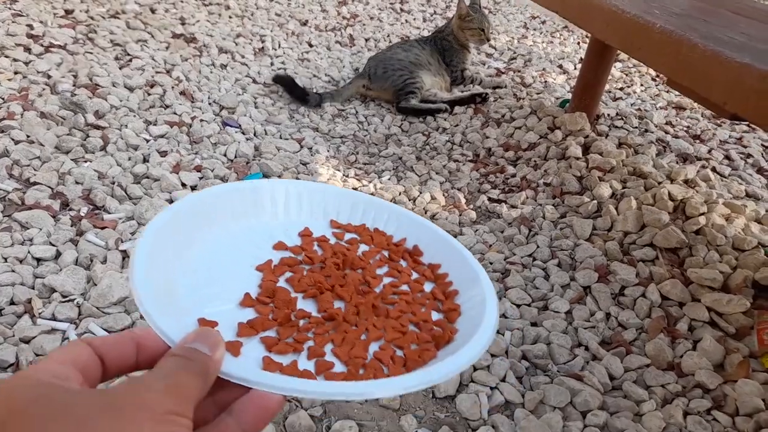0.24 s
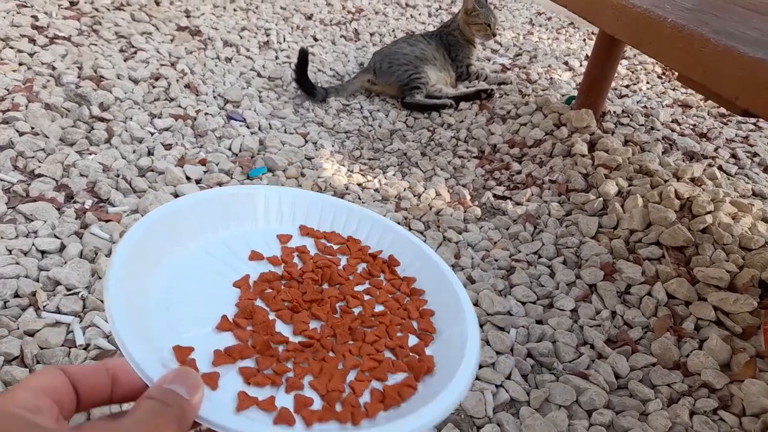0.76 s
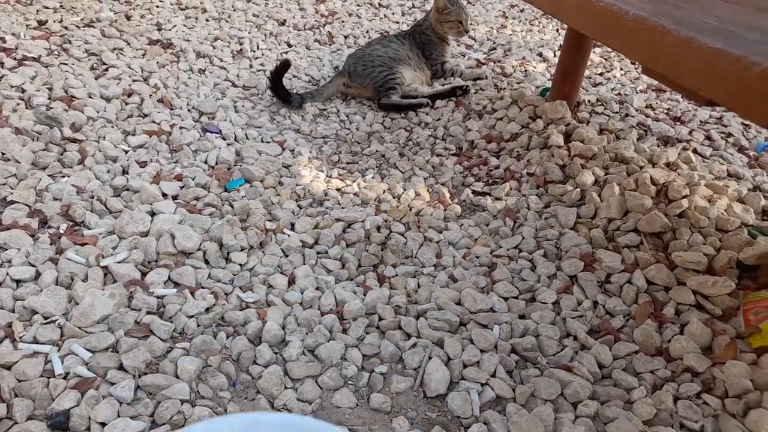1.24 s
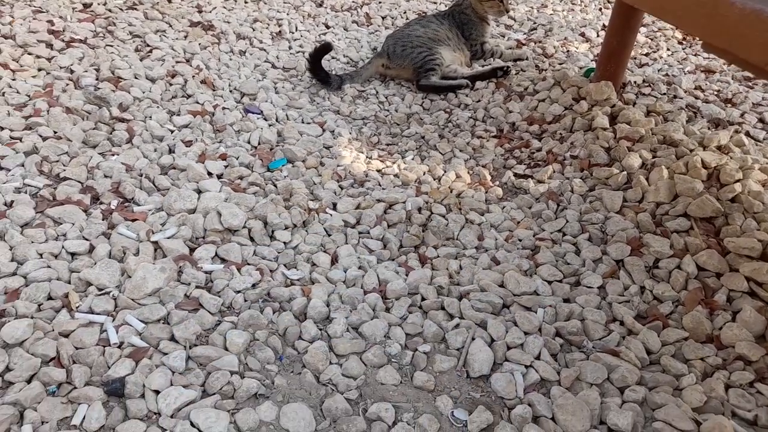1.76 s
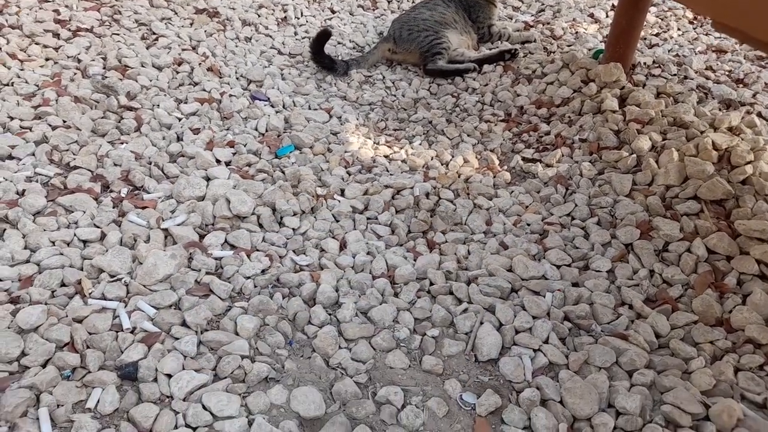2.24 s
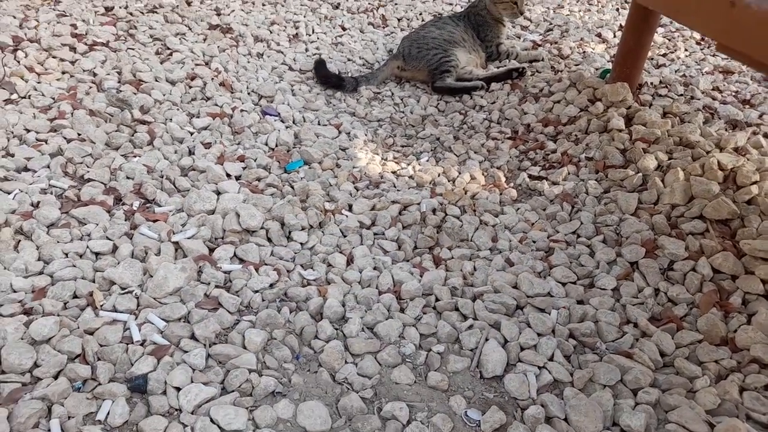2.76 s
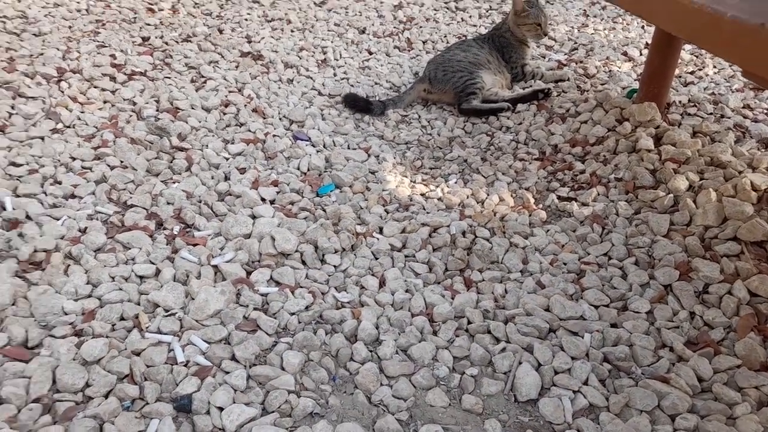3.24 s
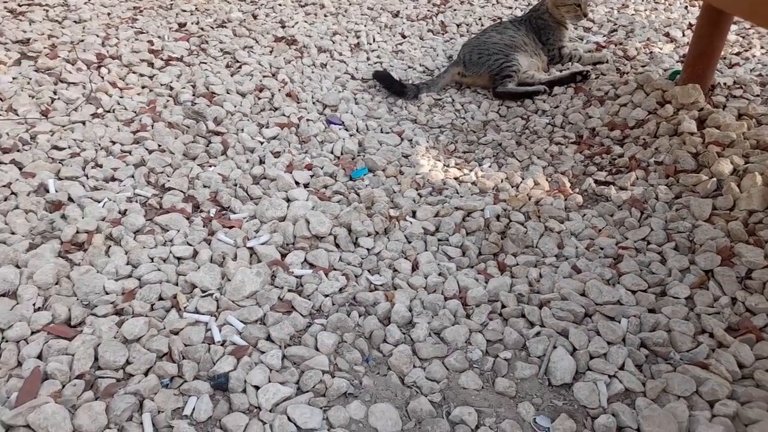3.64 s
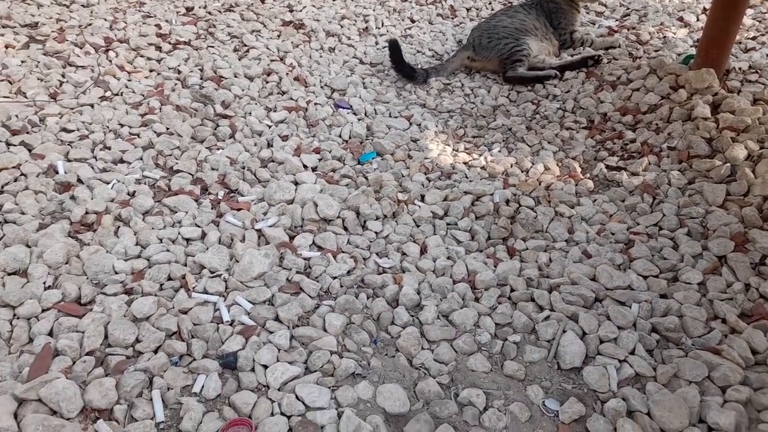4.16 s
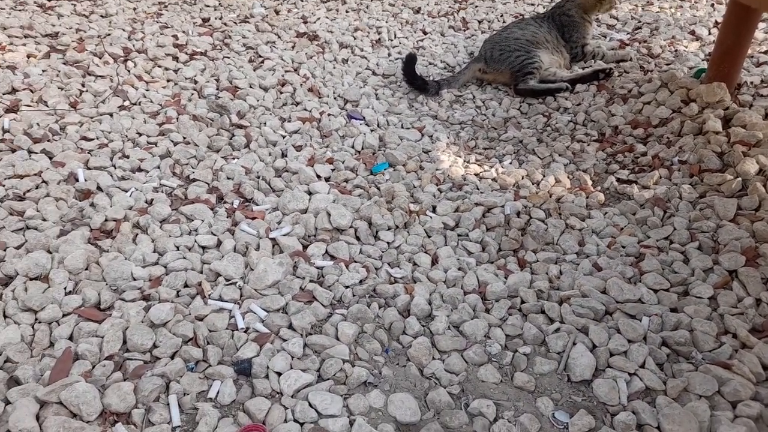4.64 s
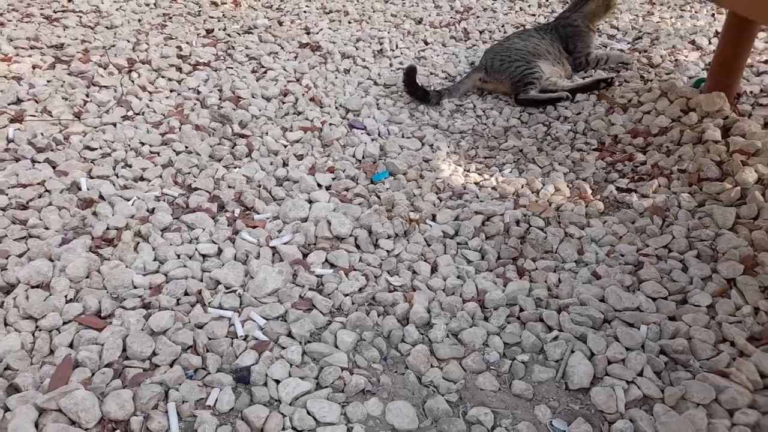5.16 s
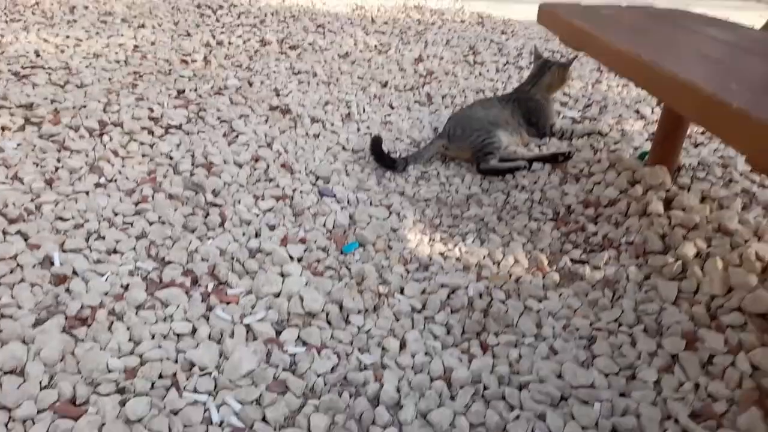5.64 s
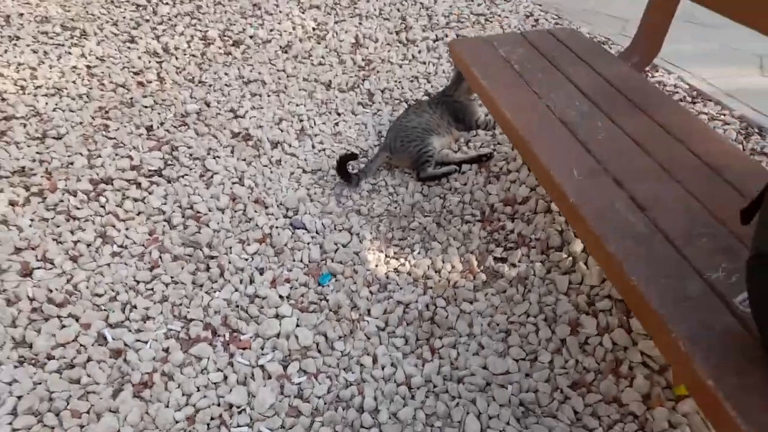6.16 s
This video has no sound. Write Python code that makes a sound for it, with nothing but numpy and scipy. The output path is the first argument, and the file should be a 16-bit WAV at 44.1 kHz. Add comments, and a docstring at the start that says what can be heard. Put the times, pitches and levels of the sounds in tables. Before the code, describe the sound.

A few shuffling steps grind loose stones outdoors, then faint cloth rustle and handling ticks, while far-off traffic rumbles steadily.

```python
"""In a park, shoes shift and scuff on coarse gravel. Each push sets a swarm of stones grinding: thousands
of small impacts merge into noise and excite hollow resonances, while single pebbles ring and click.
Distant traffic rumbles throughout, one engine humming out of it. Now and then clothes rustle by friction,
and handled things tick as the walker turns. Handling the recorder adds low thumps and rumble; its right
port resonates, so that side sounds brighter than the left."""
import sys
import numpy as np
from scipy import signal
from scipy.io import wavfile

SR = 44100
rng = np.random.default_rng(int(sys.argv[2]) if len(sys.argv) > 2 else 0)


def output_pcm(signal):
    """Save a mono or channel-first signal as 16-bit PCM at the path in sys.argv[1].

    Samples are clipped to [-1, 1] before scaling.
    """
    pcm = np.clip(np.atleast_2d(signal).T, -1, 1) * 32767
    wavfile.write(sys.argv[1], SR, np.round(pcm).astype(np.int16))


N = 282681
TIME = np.arange(N) / SR


def from_db(db):
    """Amplitude ratio of a level in decibels."""
    return 10 ** (np.asarray(db) / 20)


def unit_rms(x):
    """Normalisation to unit mean power."""
    return x / np.sqrt(np.mean(x ** 2) + 1e-20)


def at_hz(points, hz):
    """Interpolation on a logarithmic frequency axis."""
    freqs, values = np.transpose(points)
    return np.interp(np.log(hz), np.log(freqs), values)


def drift(per_s):
    """Random modulation of unit rms: straight lines between Gaussian values."""
    knots = rng.standard_normal(4096)
    return unit_rms(np.interp(TIME * per_s, np.arange(len(knots)), knots))


def swell(peak_s, half_width_s):
    """Gaussian envelope: a bell-shaped rise and fall."""
    return np.exp(-np.minimum(((TIME - peak_s) / half_width_s) ** 2, 30))


def butter(x, hz, kind, order=2):
    """Causal Butterworth filter, maximally flat in its passband."""
    sections = signal.butter(order, np.clip(hz, 10, .45 * SR), kind, fs=SR, output="sos")
    return signal.sosfilt(sections, x + 1e-18)


def resonance(x, hz, width_hz):
    """Damped oscillator: two poles, unit gain at the peak."""
    radius = np.exp(-np.pi * width_hz / SR)
    feedback = [1, -2 * radius * np.cos(2 * np.pi * hz / SR), radius ** 2]
    return signal.lfilter(np.array([1, 0, -1]) * (1 - radius ** 2) / 2, feedback, x + 1e-18)


def bands(spectrum, count):
    """Constant-percentage bands across a spectrum: edges_hz, centre_hz, gain."""
    edges = np.geomspace(spectrum[0][0], spectrum[-1][0], count + 1)
    centres = np.sqrt(edges[:-1] * edges[1:])
    return zip(zip(edges, edges[1:]), centres, from_db(at_hz(spectrum, centres)))


def stereo(mid, side, correlation):
    """Partial coherence: sum and difference of two independent signals give left and right."""
    return np.sqrt(1 + correlation) * mid + np.sqrt(1 - correlation) * side * np.array([[1], [-1]])


# Likeness of left and right in a diffuse field: frequency_hz, correlation
COHERENCE = [(60, 0.955), (150, 0.96), (300, 0.82), (640, 0.4), (1400, 0.05), (15000, 0.05)]

def diffuse_noise(spectrum, flicker_db, flicker_per_s, count):
    """Diffuse field of unit rms: long waves reach both sides alike; each band flickers on its own."""
    out, white = 0, rng.standard_normal((2, 2, N))
    for k, (edges, hz, gain) in enumerate(bands(spectrum, count)):
        mid, side = butter(white[k % 2], edges, "band")
        flicker = from_db(flicker_db * drift(flicker_per_s))
        out += gain * flicker * stereo(mid, side, at_hz(COHERENCE, hz))
    return unit_rms(out)


# Hiss of the open air: frequency_hz, relative_density_db
AIR_SPECTRUM = [(400, -2), (750, -2.5), (1020, -3), (1400, -1.5), (2100, -3), (3500, -11.5), (5000, -16),
                (8000, -30.5), (14000, -21), (16000, -24.5)]

def open_air(level_db=-59.5):
    """Ambient noise floor: a faint, nearly steady, diffuse hiss."""
    return from_db(level_db) * diffuse_noise(AIR_SPECTRUM, flicker_db=0.65, flicker_per_s=3.15, count=16)


# Low noise shared by distant traffic and handling: frequency_hz, relative_density_db
RUMBLE_SPECTRUM = [(25, -35), (40, -14.5), (62, -1), (100, -1), (150, -4.5), (210, -14), (300, -11),
                   (430, -40.5), (700, -28.5)]
# Low thumps and rumble from handling the recorder: peak_s, half_width_s, relative_level_db
HANDLING_THUMPS = [(2.1, 0.41, -36), (2.52, 0.13, -33), (4.95, 0.45, -38), (5.908, 0.094, -31.5),
                   (6.36, 0.081, -29.5)]
# The engine's hum comes forward: peak_s, half_width_s, relative_first_order_db, relative_second_order_db
ENGINE_SWELLS = [(0.5, 0.33, -42, -38.5), (0.93, 0.2, -36.5, -55), (4.85, 0.18, -36, -51)]

def traffic_and_handling(gain_db=-3, traffic_db=-35.5, sway_db=1.3, firing_hz=89.5, hum_db=-53.5):
    """Handling thumps add in power to distant traffic; an engine's firing gives two wavering harmonics."""
    power = from_db(traffic_db + sway_db * drift(per_s=5.8)) ** 2
    power += sum((from_db(db) * swell(s, width)) ** 2 for s, width, db in HANDLING_THUMPS)
    phase = 2 * np.pi * np.cumsum(firing_hz * (1 + 0.0096 * drift(per_s=8))) / SR
    first, second = np.sqrt(2) * np.sin([phase, 2 * phase])
    engine = from_db(hum_db) * first
    for peak_s, half_width_s, first_db, second_db in ENGINE_SWELLS:
        engine += swell(peak_s, half_width_s) * (from_db(first_db) * first + from_db(second_db) * second)
    noise = diffuse_noise(RUMBLE_SPECTRUM, flicker_db=0.76, flicker_per_s=11, count=12)
    rumble = np.sqrt(power) * butter(noise, 32, "high", order=4)
    return from_db(gain_db) * (rumble + engine)


# Bright swish and duller rub of cloth: frequency_hz, relative_density_db
SWISH_SPECTRUM = [(900, -3), (2100, 1.5), (3000, -1), (5000, -3.5), (7500, -14.5), (13000, -7.5),
                  (16000, -12)]
RUB_SPECTRUM = [(400, -3.5), (780, 6), (1050, -2), (2500, -4.5), (4500, -15), (6000, -24), (8000, -22),
                (16000, -36)]
# Strokes of cloth over cloth: start_s, length_s, level_db, treble_gain_db
CLOTH_STROKES = [(3.179, 0.25, -58.5, 0.5), (4.677, 0.015, -56.5, -7), (5.028, 0.021, -55.5, -18),
                 (5.103, 0.03, -56, -19), (5.795, 0.021, -46, -6), (6.146, 0.06, -55.5, 6.5)]

def clothes(turn_s=5.52, swish_db=-58, rub_db=-54, sleeve_db=-52, treble_hz=7500, crinkle_db=1.5):
    """Friction noise of cloth: short strokes, then a sleeve's swish and a lasting rub from the turn on."""
    turning = np.clip((TIME - turn_s) / 0.16, 0, 1)
    sleeve = from_db(sleeve_db) * swell(peak_s=5.55, half_width_s=0.17)
    sliding = treble = np.hypot(from_db(swish_db) * turning, sleeve)
    for start_s, length_s, level_db, treble_db in CLOTH_STROKES:
        attack = np.clip((TIME - start_s) / 0.014, 0, 1)
        release = np.exp(-np.clip((TIME - start_s - length_s) / 0.041, 0, 30))
        stroke = from_db(level_db) * attack * release
        sliding = np.maximum(sliding, stroke)
        treble = np.maximum(treble, from_db(treble_db) * stroke)
    fibres = diffuse_noise(SWISH_SPECTRUM, flicker_db=2.1, flicker_per_s=130, count=10)
    swish = sliding * butter(fibres, treble_hz, "low", order=3)
    swish += treble * butter(fibres, treble_hz, "high", order=3)
    rub = turning * diffuse_noise(RUB_SPECTRUM, flicker_db=3, flicker_per_s=160, count=14)
    return (swish + from_db(rub_db) * rub) * from_db(crinkle_db * drift(per_s=400))


# Single pebbles striking together: start_s, relative_level_db, ring_hz
PEBBLE_CLACKS = [(0.263, -20, 2044), (0.519, -29, 1920), (0.666, -27.5, 2110), (1.052, -24.5, 1560),
                 (1.135, -34.5, 1730), (1.207, -26.5, 2000), (2.252, -28.5, 2020), (2.376, -42, 1640),
                 (3.01, -40, 3300)]
# Things handled near the microphone:
# start_s, relative_level_db, ring_hz, upper_ring_gain_db, crack_gain_db, knock_gain_db
HANDLING_TICKS = [(5.566, -41, 2542, -9, -2, -20.5), (5.576, -30, 2200, -8, -2, -23),
                  (5.594, -37, 2084, -4, 3, -5), (5.621, -12, 4400, -51, -12.5, -27.5),
                  (5.651, -25, 5040, 2.5, -2.5, -37), (5.73, -43, 2606, 4.5, -28, -20),
                  (6.031, -13, 2430, -8, -32, -13), (6.131, -23.5, 1700, -42, -38, -4),
                  (6.255, -38.5, 1390, -21, -6, -15)]

def clicks(scatter_db=-30, scatter_s=0.0043):
    """Impulse response of a hard contact: damped rings, a low knock, a thin crack and ground scatter."""
    out, t = np.zeros((2, N)), TIME[:SR // 25]
    clacks = [(*row, -46, -28, -16.5) for row in PEBBLE_CLACKS]   # shared upper, crack and knock gains
    for start_s, level_db, hz, upper_db, crack_db, knock_db in [*clacks, *HANDLING_TICKS]:
        scatter = from_db(scatter_db) * rng.standard_normal(len(t)) * np.exp(-t / scatter_s)
        blow = (t == 0) + scatter
        ring = butter(resonance(blow, hz, width_hz=hz), [hz / 2, 1.19 * hz], "band")
        knock = butter(resonance(blow, hz=950, width_hz=450), 1900, "low")
        upper = butter(resonance(blow, hz=4100, width_hz=1800), 6070, "low", order=6)
        crack = butter(blow, 6800, "high")
        ring, knock, upper, crack = (part / np.abs(part).max() for part in (ring, knock, upper, crack))
        body = from_db(-5) * ring + from_db(knock_db) * knock + from_db(upper_db + 7) * upper
        crack_gains = from_db(crack_db + np.array([[15], [5]]))   # stronger on the left
        start = round(start_s * SR)
        out[:, start:start + len(t)] += from_db(level_db) * (body + crack_gains * crack)
    return out


def pebbles(force, per_s, low_hz, high_hz, cycles, count, size_db=4):
    """Poisson impacts on larger stones: each rings at its own pitch, falling 60 dB in `cycles` periods."""
    struck = rng.random(N) < per_s / SR
    sizes = unit_rms(from_db(size_db * np.minimum(rng.exponential(1, N), 2.5)))
    knocks = struck * sizes * rng.choice([-1, 1], N) * force / np.sqrt(per_s / SR)
    stone = rng.integers(0, count, N)
    pitches_hz = np.geomspace(low_hz, high_hz, count) * (1 + 0.027 * rng.standard_normal(count))
    out = 0
    for k, hz in enumerate(pitches_hz):
        width_hz = np.log(1000) / np.pi * hz / cycles
        ring = resonance(knocks * (stone == k), hz, width_hz) / np.sqrt(np.pi * width_hz / SR)
        out += ring * np.sqrt(low_hz / hz)
    return out


def grit_share(hz):
    """Crossover to fine grit, which takes over in the octave above 3600 Hz."""
    return np.clip(np.log2(hz / 3600), 0, 1)


# Hollow resonances that the grinding excites: centre_hz, width_hz, relative_level_db
HOLLOW_MODES = [(1487, 37, -10), (1630, 130, 1), (2360, 260, -6), (2700, 180, -6), (5420, 740, -16),
                (11100, 400, -31)]

def hollow_rings(impacts, grit_ratio, correlation):
    """Forced resonance: stone impacts drive fixed modes, and grit drives the highest of them."""
    out, power = 0, 0
    for hz, width_hz, mode_db in HOLLOW_MODES:
        mid, side = impacts * grit_ratio ** grit_share(hz) * rng.standard_normal((2, N))
        out += from_db(mode_db) * resonance(stereo(mid, side, correlation), hz, width_hz)
        power += from_db(mode_db) ** 2 * 2 * np.pi * width_hz / SR
    return out / np.sqrt(power)


# Stones grinding together: frequency_hz, relative_density_db
GRINDING_SPECTRUM = [(300, -35), (500, -11.5), (850, -9.5), (1130, -2), (1400, -2.5), (1700, -0.5),
                     (2100, -10), (2800, -6.5), (3500, -19), (5300, -16.5), (7700, -29.5), (11500, -21),
                     (16000, -28)]

def grinding(contacts, crunch, deep, grit, pan, correlation, sliding=0.61):
    """Shot noise of stone contacts: the deep bed sounds below the main crunch, fine grit above it."""
    out, power = 0, 0
    for (low, high), hz, gain in bands(GRINDING_SPECTRUM, count=20):
        deep_share = np.clip(np.log2(1100 / hz), 0, 1)
        force = crunch * (deep / crunch) ** deep_share * (grit / crunch) ** grit_share(hz)
        smooth = sliding * grit_share(hz)   # grit also slides between the contacts
        grain = np.sqrt((1 - smooth) * contacts ** 2 + smooth)
        mid, side = butter(grain * force * rng.standard_normal((2, N)), [low, high], "band")
        # long waves reach both ports alike; the middle range carries the direction
        band = stereo(mid, side, correlation ** ((1 - deep_share) ** 2))
        out += gain * band * pan ** (1 - deep_share - grit_share(hz))
        power += gain ** 2 * 2 * (high - low) / (SR / 2)
    return out / np.sqrt(power)


# Pushes of a sole: peak_s, relative_level_db, rise_s, fall_s, deep_stones_gain_db, grit_gain_db
PUSHES = [(0.265, -37, 0.015, 0.018, 2.5, 0.5), (0.351, -34.5, 0.01, 0.055, 2, -0.5),
          (0.413, -39, 0.057, 0.009, 4, 2), (0.528, -42, 0.014, 0.029, -7, 3),
          (0.611, -39, 0.023, 0.033, 2, -2), (0.794, -27.5, 0.027, 0.1, 10, 8.5),
          (0.884, -21, 0.037, 0.046, 9.5, 11.5), (0.967, -32.5, 0.016, 0.015, 2, 9),
          (1.026, -40.5, 0.036, 0.018, 4, 2), (1.66, -33, 0.019, 0.09, -4.5, -6.5),
          (1.674, -24.5, 0.0056, 0.017, -2, -5), (1.744, -18, 0.0087, 0.014, -7, -3),
          (1.788, -26, 0.034, 0.044, 0, -0.5), (1.951, -39, 0.0081, 0.062, 9, 4.5),
          (2.008, -32, 0.004, 0.023, 5, -3), (2.068, -17.5, 0.012, 0.017, 0, -1.5),
          (2.104, -20, 0.029, 0.007, -14, 2.5), (2.16, -28, 0.004, 0.0087, 2.5, -4),
          (2.219, -39, 0.0069, 0.009, -6, -3), (2.308, -34.5, 0.031, 0.016, 3, -3),
          (2.383, -37.5, 0.018, 0.023, 1, 4.5), (2.472, -40, 0.011, 0.098, 3, -6),
          (2.583, -37, 0.044, 0.024, 7, 4), (2.601, -14, 0.0073, 0.015, -19, 1),
          (2.637, -16.5, 0.013, 0.0096, -8, 4), (2.75, -38, 0.0037, 0.0046, -25, -15)]

def sole_force():
    """Gaussian rise and exponential decay of each push: envelopes of crunch, deep stones, grit, ringing."""
    power = np.zeros((4, N)) + 1e-12
    lasting = np.array([[1], [1], [0.67], [1]])   # fine grit comes to rest before the stones do
    for peak_s, level_db, rise_s, fall_s, deep_db, grit_db in PUSHES:
        near = np.abs(TIME - peak_s) < .5
        since = TIME[near] - peak_s
        exponent = np.where(since < 0, (since / rise_s) ** 2, since / (fall_s * lasting))
        envelope = np.exp(-np.minimum(exponent, 30))
        parts_db = np.array([0, deep_db, grit_db, -5.5 + 0.91 * grit_db])   # a gritty push rings more
        power[:, near] += (from_db(level_db + parts_db)[:, None] * envelope) ** 2
    return np.sqrt(power)


def settling(decay_s=0.091, full_push_s=0.06, below_push_db=15, limit_db=-42):
    """Relaxation: stones shift ever more weakly after a push; a short skid disturbs few of them."""
    kicks = np.zeros(N)
    for peak_s, level_db, rise_s, fall_s, *_ in PUSHES:
        strength = from_db(min(level_db - below_push_db, limit_db))
        kicks[round(peak_s * SR)] += (strength * (rise_s + fall_s) / full_push_s) ** 2
    return np.sqrt(signal.lfilter([1], [1, -np.exp(-2 / (decay_s * SR))], kicks + 1e-18))


# Direction of the shoe: time_s, right_minus_left_db
SHOE_PAN = [(0, -4), (1.2, 0.5), (1.7, 2.5), (2.6, 6)]
# Balance of the settling stones: crunch_db, deep_stones_db, grit_db, ringing_db
SETTLING_BALANCE = [-0.5, 3, 8.5, -4]

def gravel(peak_contacts_per_s=8000, crowding=0.41, size_db=2.2, correlation=0.39, settling_db=-7):
    """Granular friction: the harder the sole presses, the more densely contacts of random size crowd."""
    shifting = settling()
    settling_gains = from_db(settling_db + np.array(SETTLING_BALANCE)[:, None])
    crunch, deep, grit, ringing = np.hypot(sole_force(), settling_gains * shifting)
    side_db = np.interp(TIME, *np.transpose(SHOE_PAN))
    pan = from_db(side_db * np.array([[-.5], [.5]]))
    chance = np.clip(peak_contacts_per_s * (crunch / crunch.max()) ** crowding / SR, .004, 1)
    struck = rng.random(N) < chance
    sizes = unit_rms(from_db(size_db * np.minimum(rng.exponential(1, N), 3)))
    contacts = struck * sizes / np.sqrt(chance)   # unit mean power at any density
    grind = grinding(contacts, crunch, deep, grit, pan, correlation)
    rings = hollow_rings(contacts * ringing, grit / crunch, correlation)
    knocks = pebbles(crunch, per_s=170, low_hz=1100, high_hz=2900, cycles=24, count=18)
    trickle = pebbles(shifting, per_s=70, low_hz=1204, high_hz=2420, cycles=22, count=8)
    tones = from_db(-6) * rings + from_db(-7) * knocks + from_db(-8) * trickle
    return from_db(-5) * grind + pan * tones


def scene():
    """Superposition: gravel, clicks and cloth over the air; traffic and handling thumps lean right."""
    return open_air() + gravel() + clicks() + clothes() + traffic_and_handling() * from_db([[-1.45], [1.45]])


# Resonances of the right microphone port: centre_hz, width_hz, boost_db
PORT_MODES = [(2005, 700, 4), (2260, 850, 4.5), (5170, 1720, 9.5)]

def record(dry, ceiling=0.9, cutoff_hz=15900):
    """Port resonance colours and delays the right side; saturation rounds peaks and the top is cut."""
    left, right = dry
    for hz, width_hz, boost_db in PORT_MODES:
        right = right + (from_db(boost_db) - 1) * resonance(right, hz, width_hz)
    for hz, width_hz in [(2900, 1100), (6000, 2200)]:
        right = right - 2 * resonance(right, hz, width_hz)   # an allpass: one full turn of phase
    both = np.array([left, right])
    rounded = both / (1 + (both / ceiling) ** 6) ** (1 / 6)
    low_pass = signal.ellip(12, .1, 80, cutoff_hz, fs=SR, output="sos")
    return signal.sosfilt(low_pass, rounded)


dry = scene()
out = record(dry)
output_pcm(out)
```